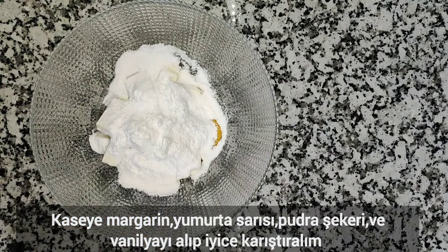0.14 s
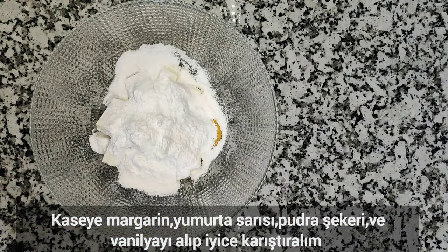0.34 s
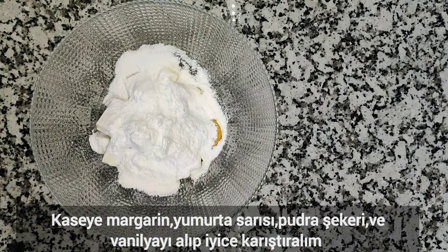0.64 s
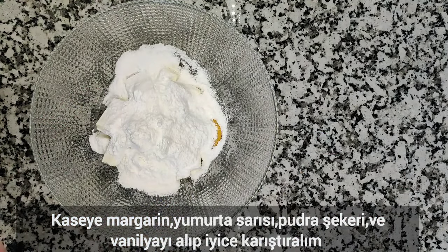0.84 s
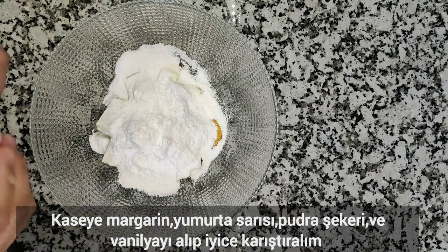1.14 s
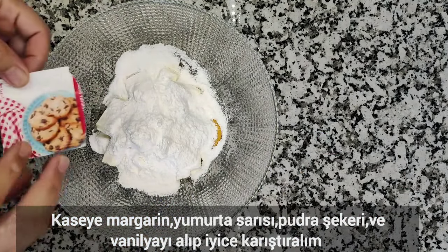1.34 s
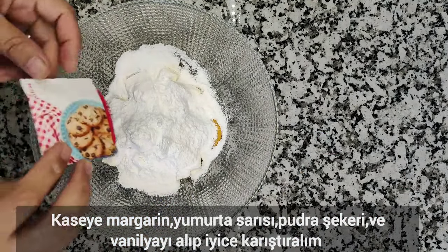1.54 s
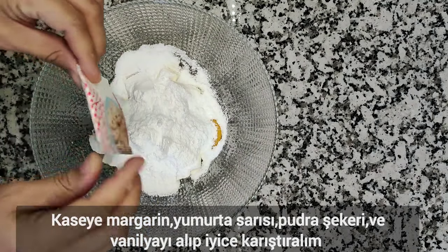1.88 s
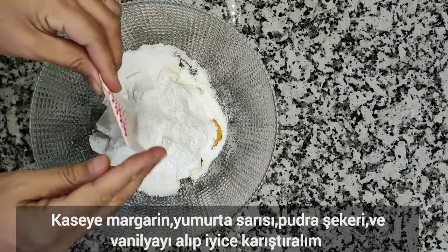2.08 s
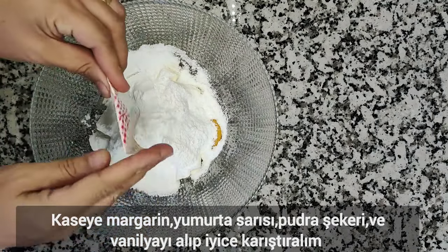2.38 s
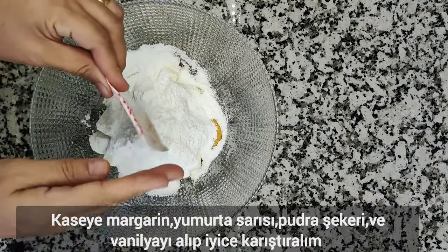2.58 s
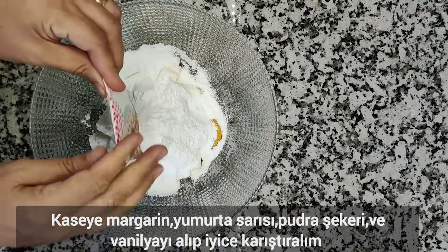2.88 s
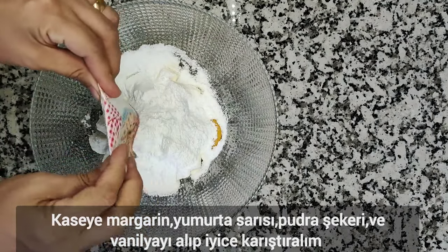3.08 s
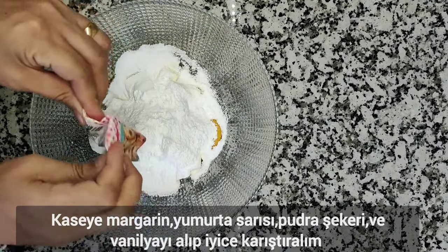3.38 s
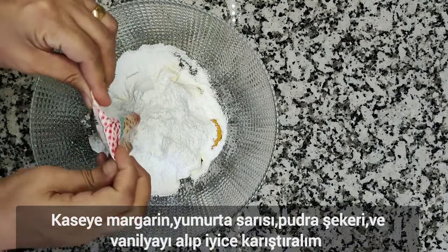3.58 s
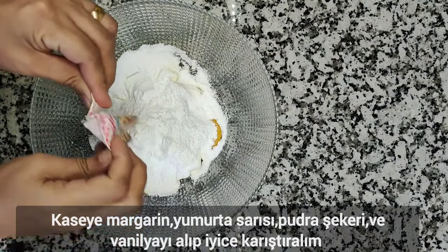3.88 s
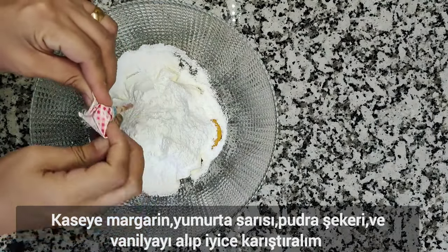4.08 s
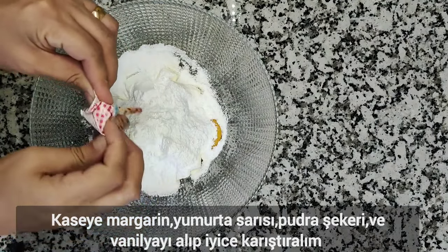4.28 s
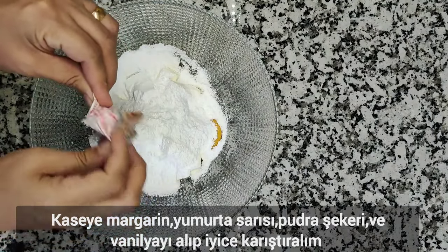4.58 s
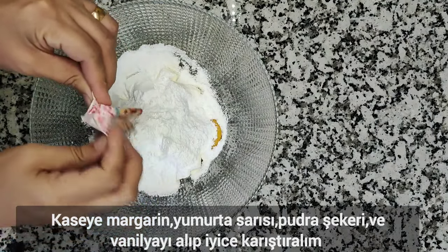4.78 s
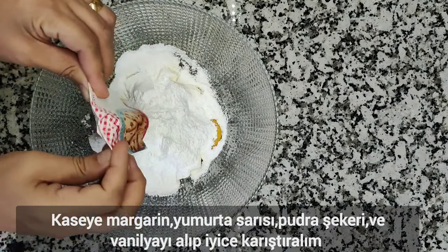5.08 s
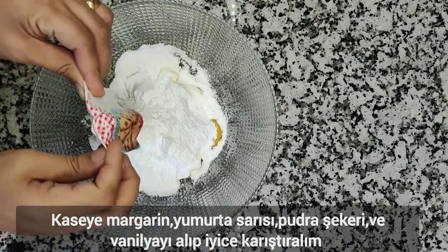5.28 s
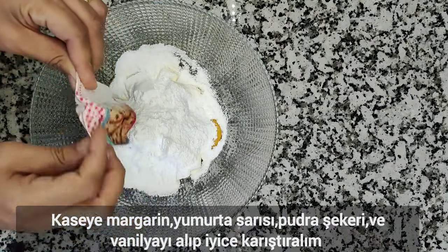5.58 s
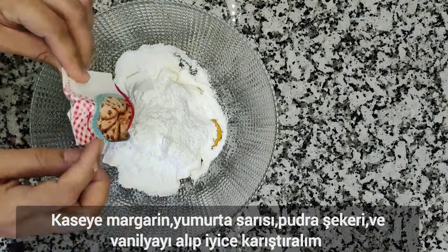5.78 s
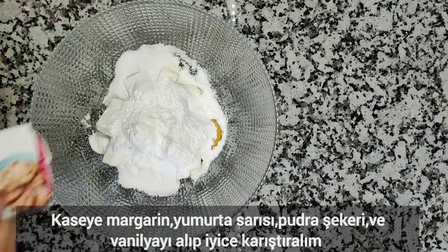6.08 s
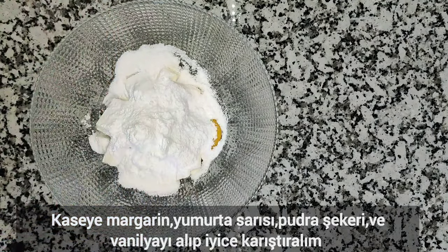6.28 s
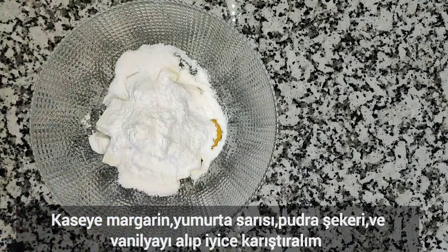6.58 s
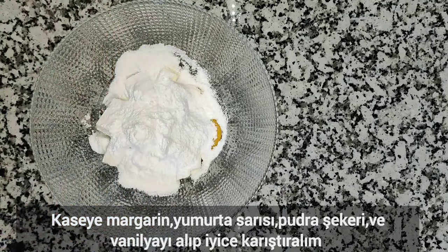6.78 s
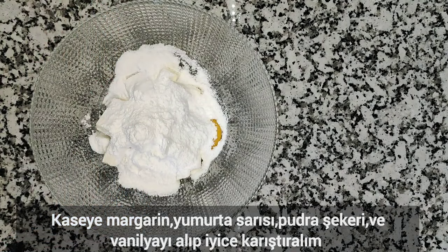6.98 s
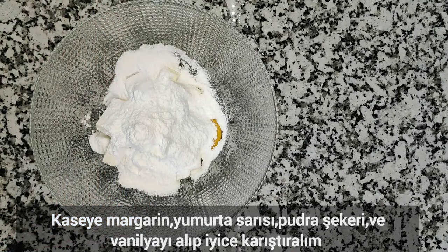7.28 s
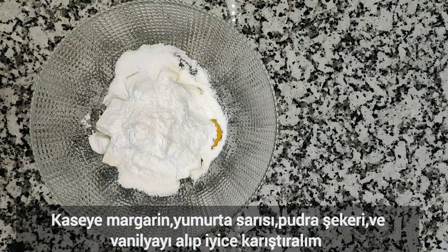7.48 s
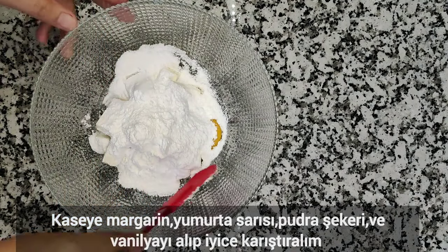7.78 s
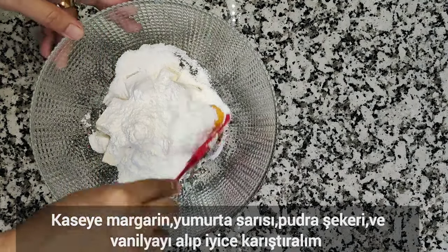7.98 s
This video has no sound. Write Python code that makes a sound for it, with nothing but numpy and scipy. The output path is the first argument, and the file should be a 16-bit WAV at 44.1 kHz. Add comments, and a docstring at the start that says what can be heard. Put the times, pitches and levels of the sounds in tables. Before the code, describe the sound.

A small paper sachet crackles with crisp snaps and dull pops over a glass bowl, then flops on the counter before a spatula hisses in sugar.

```python
"""A small paper sachet is tapped, shaken and squeezed empty over a glass bowl on a stone kitchen counter.
Creases flip over in dull pops and crisp snaps, and rubs catch and slip: shaped noise in the sheet's registers.
The empty sachet drops with a thud of decaying noise bands, then a spatula slides hissing into powdered sugar.
Resonators ring as the bowl, noise echoes make the small, hard room, and wavering sines hum as the fridge."""
import sys
import numpy as np
from scipy import signal
from scipy.fft import rfft, irfft
from scipy.io import wavfile
from scipy.ndimage import uniform_filter1d

SR = 44100
rng = np.random.default_rng(int(sys.argv[2]) if len(sys.argv) > 2 else 0)


def dump(signal):
    """Clip the signal to [-1, 1] and save it as 16-bit WAV at the path in sys.argv[1]."""
    limited = np.clip(np.atleast_2d(signal).T, -1, 1)
    pcm = np.round(limited * 32767).astype(np.int16)
    wavfile.write(sys.argv[1], SR, pcm)


N = 358974

# dull pops, a patch of the sheet flips over: t/s, pitch f/Hz, level before the trim in snaps()/dB
POP_EVENTS = [(0.4362, 2930, -53.5), (0.504, 3070, -48), (0.6102, 2900, -42), (3.3051, 2910, -37.5),
              (3.4058, 2230, -38.5), (3.603, 3140, -41.5), (3.7249, 2360, -45.5), (3.9027, 2080, -42),
              (4.052, 2800, -45.5), (4.257, 2190, -40), (4.2843, 2800, -30), (4.3425, 2100, -38),
              (4.484, 2820, -28.5), (4.539, 2080, -29.5), (4.542, 1280, -35.5), (4.698, 2260, -36.5),
              (4.8869, 2530, -34), (5.0203, 2750, -39.5), (5.07, 2670, -32.5), (5.2574, 2720, -32),
              (5.4389, 2600, -41), (5.603, 2640, -38), (5.7827, 2550, -48.5), (6.2125, 1950, -41.5),
              (6.9238, 2600, -41)]


def snaps(crumple_s=.0013, swell=0.59, grain_db=4.5, trim_db=0.5, settle_db=-21):
    """A crease flips over within a few milliseconds; trimmed levels are body rms over a hundredth of a second."""
    out = np.zeros(N)
    age = np.arange(SR // 20) / SR / crumple_s
    # the swell is a share of the crumple time
    envelope = np.exp(-age) * (1 - np.exp(-age / swell))
    for s, hz, body_db, colour_db in buckles():
        snap = fibres(envelope, hz, 0.26, body_db + trim_db, colour_db, grain_db, flip=0.7)
        add(out, s, snap)
        # the fresh crease settles with one more tiny tick
        add(out, s + rng.uniform(0.011, 0.039), from_db(settle_db) * snap)
    return out * np.sqrt(SR / 100)


def buckles(crinkle_count=45, pitch_scatter=0.079):
    """Pops, snaps and faint crinkles as (s, pitch, level, colour); snap and crinkle pitches vary by crease."""
    # a smaller, higher patch pops more crisply, in dB per octave above the usual pop
    usual_pop_hz, pop_crisp_db, crisp_db_per_octave = 2550, -16.5, 11
    for s, hz, db in POP_EVENTS:
        crisp_db = pop_crisp_db + crisp_db_per_octave * np.log2(hz / usual_pop_hz)
        yield s, hz, db, colour(db, crisp_db, thud_db=-11.5, thud_lag=0.7)

    # crisp snaps, a crease cracks: t/s, level before the trim/dB, crispness before the register trim/dB
    crease_cracks = [(0.4137, -60, 6), (0.5553, -40, -4.5), (0.6761, -49, -6.5), (0.9362, -55, -8),
                     (1.1027, -52.5, -8.5), (1.2585, -56, -7.5), (1.3706, -59.5, -9), (1.5205, -52.5, -12),
                     (1.6359, -51, -3.5), (2.1123, -49, -4), (2.2331, -47, -7.5), (2.2957, -49, -9.5),
                     (2.3739, -50, -6), (2.5339, -49.5, -4), (2.6252, -45, -10), (2.6865, -49, -6),
                     (2.7622, -39, -6.5), (2.8429, -48.5, -4.5), (2.9159, -54.5, -8), (2.9817, -53, -4),
                     (3.1841, -46.5, -5), (3.2986, -42, 0.5), (3.3408, -40.5, -2), (3.9208, -42, -7),
                     (3.9837, -41.5, -2.5), (4.0946, -46, 3.5), (4.2609, -37, 1.5), (4.358, -37, 2),
                     (4.4196, -53.5, 0), (4.442, -45, 5.5), (4.5157, -36, 2.5), (4.539, -39, 1.5),
                     (4.5944, -43.5, 4), (4.6402, -34, -3.5), (4.7088, -37, -4), (4.7865, -50.5, 2),
                     (4.8166, -42.5, 3), (4.9715, -48, 3), (5.0008, -45.5, 6), (5.0909, -48.5, 0),
                     (5.1956, -44.5, -4), (5.346, -48, 4), (5.3725, -43.5, 4), (5.5345, -45.5, 5.5),
                     (5.6215, -46, 1.5), (5.6984, -45.5, 5), (5.8244, -45.5, 3.5), (6.1395, -53.5, -4),
                     (6.2124, -44.5, -1)]
    # the sheet sounds lower once the powder has run out: t/s, pitch before scatter f/Hz
    sheet_pitch = [(3.0, 2970), (3.5, 2480)]
    # the hands squeeze hardest to get the last powder out: t/s, lift of the crinkles/dB
    squeeze = [(3.2, -8), (4.5, 9), (5.9, 0.5)]
    # faint crinkles all the while the sachet is held
    held_from_s, held_to_s = .35, 6.2
    crinkle_db, spread_db, crinkle_crisp_db = -68.5, 5, -3
    crinkles = []
    for s in rng.uniform(held_from_s, held_to_s, crinkle_count):
        db = crinkle_db + at_s(squeeze, s) + spread_db * rng.standard_normal()
        crinkles.append((s, db, crinkle_crisp_db))
    for s, db, crisp_db in crease_cracks + crinkles:
        hz = at_s(sheet_pitch, s) * np.exp(pitch_scatter * rng.standard_normal())
        yield s, hz, db, colour(db, crisp_db)


def colour(body_db, crisp_db, thud_db=-7.5, thud_lag=0.22):
    """Flap, thud, crispness and fizz in dB re the body, before the register trims; flap goes with thud."""
    usual_db = -47
    # the thud grows more slowly than the body: dB lost per dB above the usual level
    low_db = thud_db - thud_lag * (body_db - usual_db)
    # the sharper the break, the more fizz
    fizz_db = -10.5 + 1.45 * crisp_db
    return low_db, low_db, crisp_db, fizz_db


def fibres(envelope, body_hz, body_width, body_db, colour_db, grain_db, flip=0):
    """Fibres give way in uneven little steps under an envelope and sound the registers of the sheet."""
    # flap, thud, crispness and fizz around the body: low edge f/Hz, high edge f/Hz, trim/dB
    sheet_registers = [(140, 464, -11.5), (490, 1940, 1), (3765, 8270, 1), (8480, 13870, 2.5)]
    unevenness = np.clip(rng.standard_normal(len(envelope)), -2, 2)
    steps = envelope * from_db(grain_db * unevenness)

    def crackle():
        return unit(steps * rng.standard_normal(len(steps)))

    # each buckle of the sheet, pop, snap or crinkle alike, gives the body one clean push
    push = crackle() + flip * (envelope == envelope.max())
    spread = 1 + body_width
    out = unit(band(push, body_hz / spread, body_hz * spread, order=2))
    for (low_hz, high_hz, trim_db), rel_db in zip(sheet_registers, colour_db):
        out = out + from_db(rel_db + trim_db) * unit(band(crackle(), low_hz, high_hz))
    return from_db(body_db) * out


def slides(strokes, rise, fall, catch_db, grain_db, trim_db, body_hz=2500, catch_rate_hz=330, slip_s=0.001):
    """A stroke swells and fades; a few hundred times a second it catches and lets go with a tiny crack."""
    out = np.zeros(N)
    r = np.exp(-1 / (slip_s * SR))
    for s, length_s, body_db, crisp_db in strokes:
        along = np.linspace(0, 1, int(max(length_s, .002) * SR))
        catches = (rng.random(len(along)) < catch_rate_hz / SR) * rng.random(len(along))
        # each catch lets go over the slip time
        grip = 1 + from_db(catch_db) * signal.lfilter([1], [1, -r], catches + 1e-18)
        envelope = along ** rise * (1 - along) ** fall * grip
        stroke = fibres(envelope, body_hz, 0.318, body_db + trim_db, colour(body_db, crisp_db), grain_db)
        # unit energy to a level that holds for any length
        add(out, s, np.sqrt(len(along)) * stroke)
    return out


def slack(from_s=3.5, delay_s=.012, length_s=0.059, rel_db=-18.5, top_db=-51, crisp_db=-3.5):
    """Once the sachet is nearly empty, its slack paper slides on after each pop, up to a top level."""
    return [(s + delay_s, length_s, min(db + rel_db, top_db), crisp_db)
            for s, hz, db in POP_EVENTS if s > from_s]


def handling():
    """Paper and sugar under the hands ring the bowl, and the sachet lands: the sound in one direction."""
    # crumples and rubs of the paper, in the fingers and as the sachet lands:
    # t/s, length/s, level before the trim/dB, crispness before the register trim/dB
    paper_rubs = [(0.71, 0.059, -56, -1), (0.7193, 0.015, -43, 1), (1.565, 0.088, -64, 0.5),
                  (2.345, 0.045, -63, 4), (2.91, 0.094, -65.5, 1.5), (3.34, 0.11, -41.5, -6.5),
                  (3.374, 0.0094, -31.5, -1.5), (3.5047, 0.016, -39, -6), (3.53, 0.079, -52, -17),
                  (3.788, 0.07, -52, -9), (4.15, 0.086, -50, -4), (4.1522, 0.02, -41.5, 0.5),
                  (4.6207, .03, -46.5, 3.5), (5.168, 0.051, -49.5, 2.5), (6.8655, 0.022, -46, -3),
                  (6.92, .14, -52.5, -11.5)]
    # one slide of the spatula in the sugar, same columns
    spatula_slide = [(7.922, .19, -64.5, 1.9)]
    rubbing = slides(paper_rubs + slack(), rise=0.52, fall=1.42, catch_db=14, grain_db=3.0, trim_db=-1.5)
    paper = snaps() + rubbing
    sugar = slides(spatula_slide, rise=0.33, fall=1.56, catch_db=11, grain_db=0.5, trim_db=-5.5)
    # the fine sugar grains hiss high up
    sugar = sugar + from_db(3.0) * band(sugar, 6500, 14000, order=1)
    return bowl(paper + sugar) + landing()


def landing(s=6.925, t60_s=0.41):
    """The empty sachet flops onto the counter with a low, papery thud of decaying noise bands."""
    # the counter's bands: low edge f/Hz, high edge f/Hz, starting level/dB
    counter_bands = [(180, 260, -48.5), (450, 680, -46.5), (1360, 1650, -50.5)]
    out = np.zeros(N)
    t = np.arange(SR // 3) / SR
    for low_hz, high_hz, level_db in counter_bands:
        flop = band(rng.standard_normal(len(t)), low_hz, high_hz, order=2)
        add(out, s, from_db(level_db - 60 * t / t60_s) * flop / np.std(flop))
    return out


def bumps(spread=0.24):
    """Each soft knock or puff is a few slow, uneven swings of pressure: narrow noise under a half-sine."""
    # soft knocks of the hands and sachet, and puffs of air: t/s, length/s, centre f/Hz, nominal peak level/dB
    soft_knocks = [(3.521, 0.03, 520, -45), (3.784, 0.053, 405, -51), (2.75, 0.053, 405, -51.5),
                   (4.9, 0.12, 82, -45), (7.535, 0.069, 70, -56)]
    out = np.zeros(N)
    for s, length_s, hz, peak_db in soft_knocks:
        t = np.arange(int(length_s * SR)) / SR
        noise = rng.standard_normal(SR)
        # the filter has settled by the end of the noise
        swings = band(noise, hz / (1 + spread), hz * (1 + spread), order=2)[-len(t):]
        knock = unit(np.sin(np.pi * t / length_s) * swings)
        # rms half of the nominal peak
        add(out, s, from_db(peak_db) * np.sqrt(len(t)) / 2 * knock)
    return out


def bowl(x):
    """The bowl and the cupped hands ring along with the paper: two-pole resonators beside the dry sound."""
    # resonances of the bowl and the cupped hands: f/Hz, width f/Hz, level before the ring lift/dB
    hollow_modes = [(399, 54, 7.5), (603, 19, 0.5), (776, 28, 7), (1156, 84, -4), (1866, 110, -4.5),
                    (2143, 110, 1), (2623, 100, 2.5), (3000, 85, 0.5)]
    # the sachet comes over the bowl and leaves again: t/s, lift of the ring/dB
    over_bowl = [(1.3, -6), (2.0, -1), (5.9, -0.5), (6.3, -2.5)]
    out = x.copy()
    drive = x * from_db(at_s(over_bowl, np.arange(N) / SR))
    for hz, width_hz, level_db in hollow_modes:
        r = np.exp(-np.pi * width_hz / SR)
        poles = [1, -2 * r * np.cos(2 * np.pi * hz / SR), r * r]
        ring = (1 - r * r) / 2 * signal.lfilter([1, 0, -1], poles, drive + 1e-18)
        out += from_db(level_db) * ring
    return out


def places(x, count=4, move_s=.07):
    """The hands keep moving: glide the sound round a few positions, each with echoes of its own."""
    position = np.arange(N) / SR / move_s
    return [x * np.sqrt(np.maximum(1 - np.abs((position - k) % count - 1), 0)) for k in range(count)]


def kitchen(x, port, lag_s, direct_db, near_swell_s, near_t60_s, room_db, room_t60_s):
    """Path to one port: direct sound, a cluster of echoes off bowl and counter, then the room's noise tail."""
    t = np.arange(2 * (SR // 3)) / SR

    def dying(t60_s):
        return rng.standard_normal(len(t)) * from_db(-60 * t / t60_s)

    near = unit(dying(near_t60_s) * (1 - np.exp(-t / near_swell_s)))
    # an added dull layer dies a little sooner
    dull = signal.lfilter(*signal.butter(1, 1500, fs=SR), dying(room_t60_s * 0.85))
    room = unit((dying(room_t60_s) + dull) * (1 - np.exp(-t / 0.0015)))
    path = rfft(from_db(direct_db) * (t == 0) + near + from_db(room_db) * room)
    hz = np.linspace(0, SR / 2, len(path))
    # the echoes comb the spectrum finely; its broad shape is that of the port
    broad = np.sqrt(uniform_filter1d(np.abs(path) ** 2, size=70))
    response = irfft(path * causal(from_db(at_hz(port, hz)) / broad))
    heard = signal.fftconvolve(x, response)[:N]
    return np.interp(np.arange(N) - lag_s * SR, np.arange(N), heard, left=0)


def still_room(waver=0.35, lag_s=0.000417, air_db=-62):
    """Soft air noise, partly alike at both ports and later at the left, and the wavering hum of the fridge."""
    # shape of the air noise: f/Hz, relative level per Hz/dB
    air_shape = [(12, -49.5), (20, -11.5), (42, -1.5), (95, -11), (165, -12.5), (386, -12), (468, -15.5),
                 (632, -16.5), (725, -21), (928, -19), (1560, -27.5), (2490, -25), (4190, -37),
                 (14000, -44)]
    # left-right likeness of the air noise: f/Hz, correlation (1 = same)
    port_likeness = [(50, 0.84), (180, 0.36), (550, 0.67), (1500, 0.04)]
    # fridge lines: f/Hz, rms level before wavering/dB
    fridge_lines = [(95.5, -71), (142, -76.5), (289, -78.5)]
    hz = np.fft.rfftfreq(N, 1 / SR)
    t = np.arange(N) / SR
    lags = np.array([[lag_s], [0]])
    alike = at_hz(port_likeness, hz)
    mid, side = rfft(rng.standard_normal((2, N))) * from_db(at_hz(air_shape, hz))
    ports = np.sqrt(1 + alike) * mid + np.sqrt(1 - alike) * side * [[1], [-1]]
    air = irfft(ports * np.exp(-2j * np.pi * hz * lags), N)
    # overall rms of the two ports
    out = from_db(air_db) * np.sqrt(2 * N) * unit(air)
    for line_hz, level_db in fridge_lines:
        # slow random drift of size and phase
        knots = waver * rng.standard_normal((2, 40))
        size, phase = [np.interp(t, np.linspace(0, t[-1], len(k)), k) for k in knots]
        hum = (1 + size) * np.sin(2 * np.pi * line_hz * (t - lags) + 2 * phase)
        out = out + np.sqrt(2) * from_db(level_db) * hum
    return out


def from_db(db):
    """Decibels to gain."""
    return 10 ** (np.asarray(db) / 20)


def at_s(points, s):
    """Read a curve in time."""
    return np.interp(s, *np.transpose(points))


def at_hz(points, hz):
    """Read a spectrum on a log-frequency axis."""
    known, values = np.transpose(points)
    return np.interp(np.log(np.maximum(hz, 1)), np.log(known), values)


def unit(x):
    """Scale to an energy of one."""
    return x / np.sqrt(np.sum(x ** 2) + 1e-20)


def add(track, s, sound):
    """Mix a sound into a track at a time."""
    start = int(s * SR)
    track[start:start + len(sound)] += sound[:N - start]


def band(x, low_hz, high_hz, order=3):
    """Band-pass."""
    sos = signal.butter(order, [low_hz, high_hz], "band", fs=SR, output="sos")
    return signal.sosfilt(sos, x + 1e-18)


def causal(gain):
    """Minimum-phase response for a gain curve: nothing sounds early."""
    cepstrum = irfft(np.log(gain))
    half = len(cepstrum) // 2
    cepstrum[1:half] *= 2
    cepstrum[half + 1:] = 0
    return np.exp(rfft(cepstrum))


def scene(shared=0.74):
    """The right port faces the hands; the left one hears another side of the sheet, and more echoes."""
    # colour of the sound at each microphone port: f/Hz, level/dB
    left_port = [(250, 0), (850, 0), (1500, -7), (2100, -3), (2900, -9), (3900, -6.5), (6500, -10),
                 (8700, -4.5), (11500, -1), (14500, -4.5)]
    right_port = [(250, 0), (650, 0.5), (1400, -5), (2000, 0.5), (2700, 0.5), (3700, 0.5), (5500, 1.5),
                  (7300, 2.5), (8400, -3.5), (10000, -4.5), (14000, 2)]
    front = handling()
    # the same pops, snaps and rubs, mixed with a second draw of grain, pitch scatter, crinkles and settling ticks
    aside = np.sqrt(shared) * front + np.sqrt(1 - shared) * handling()
    left = sum(kitchen(x, left_port, lag_s=.00045, direct_db=-9.5, near_swell_s=0.0037, near_t60_s=0.05,
                       room_db=-5.5, room_t60_s=0.32) for x in places(aside))
    right = sum(kitchen(x, right_port, lag_s=0, direct_db=-5.5, near_swell_s=0.0011, near_t60_s=0.036,
                        room_db=-10.5, room_t60_s=0.2437) for x in places(front))
    return np.array([left, right]) + bumps() + still_room()


def record(dry):
    """A steep elliptic low-pass cuts the top above 14450 Hz."""
    return signal.sosfilt(signal.ellip(10, .2, 70, 14450, fs=SR, output="sos"), dry)


dry = scene()
out = record(dry)
dump(out)
```